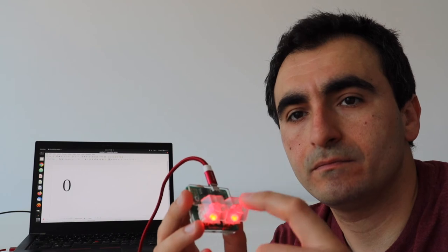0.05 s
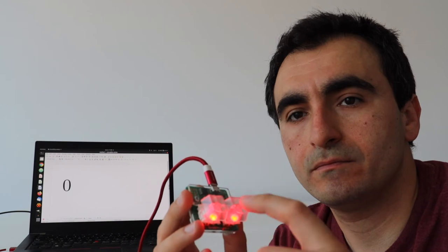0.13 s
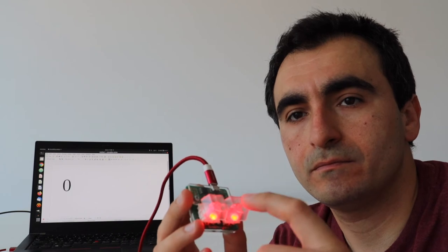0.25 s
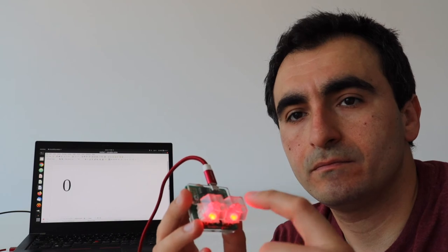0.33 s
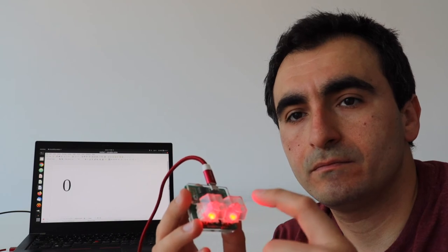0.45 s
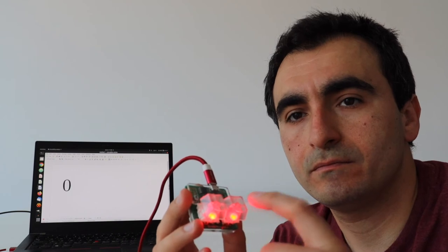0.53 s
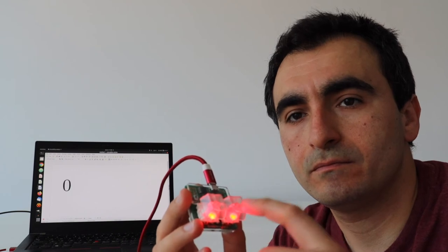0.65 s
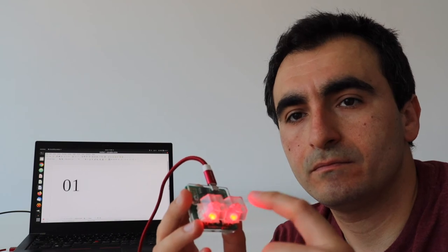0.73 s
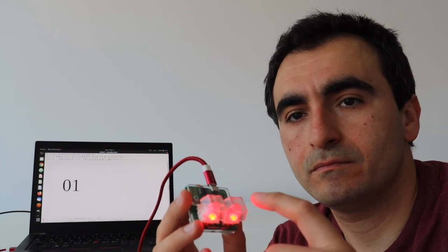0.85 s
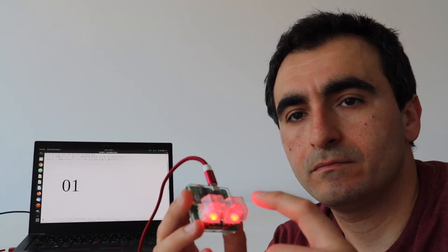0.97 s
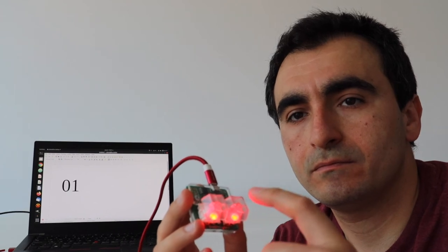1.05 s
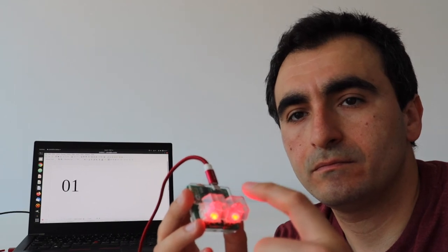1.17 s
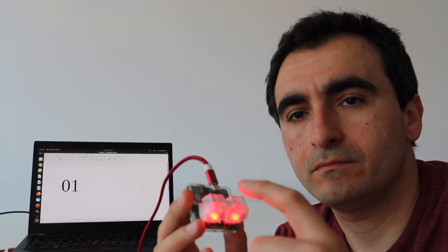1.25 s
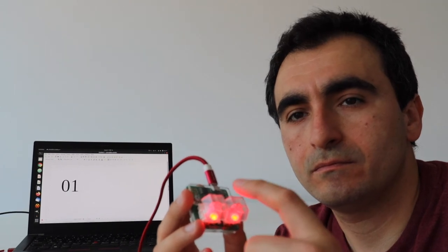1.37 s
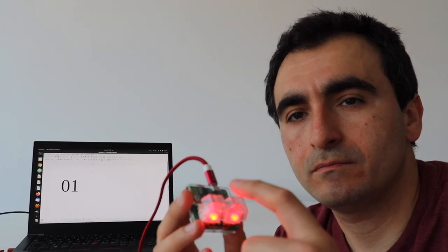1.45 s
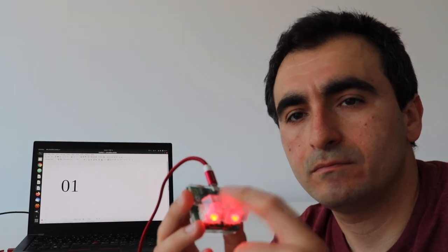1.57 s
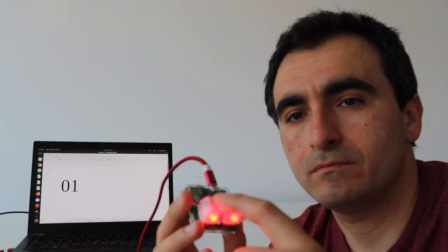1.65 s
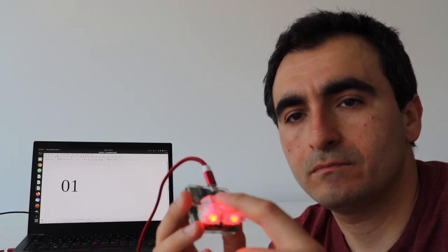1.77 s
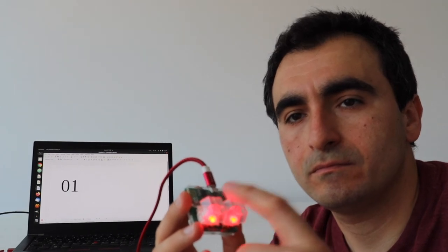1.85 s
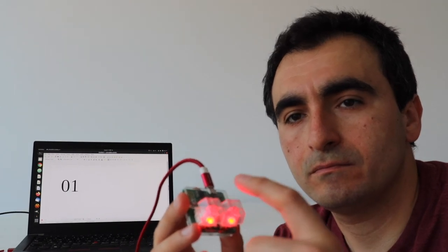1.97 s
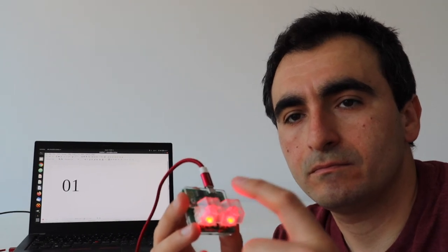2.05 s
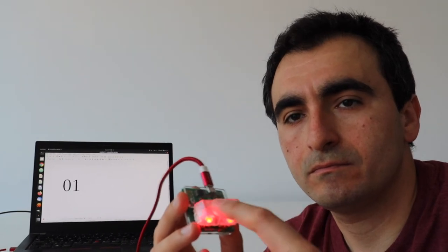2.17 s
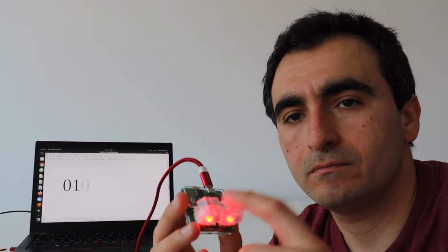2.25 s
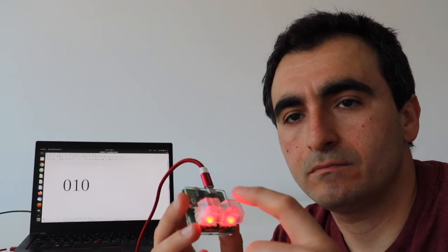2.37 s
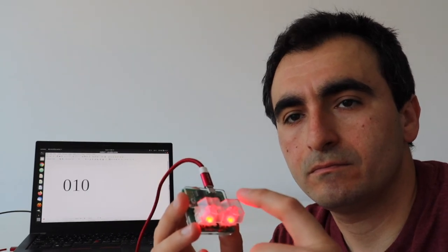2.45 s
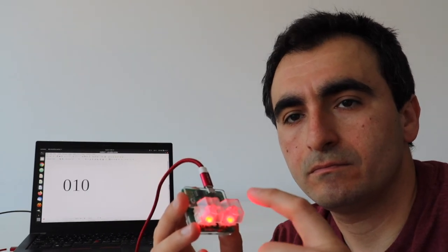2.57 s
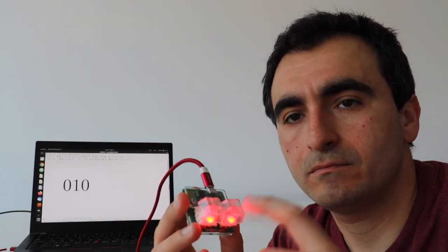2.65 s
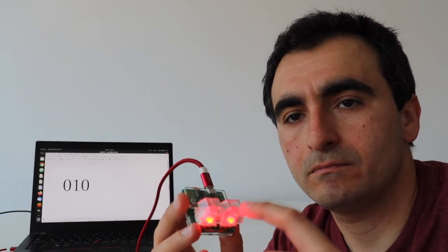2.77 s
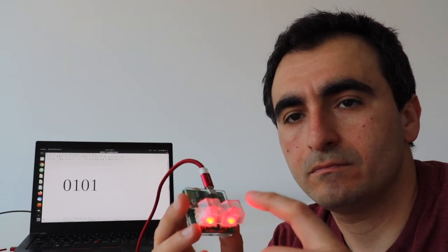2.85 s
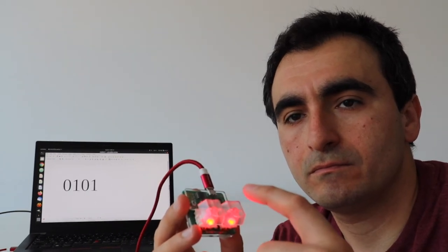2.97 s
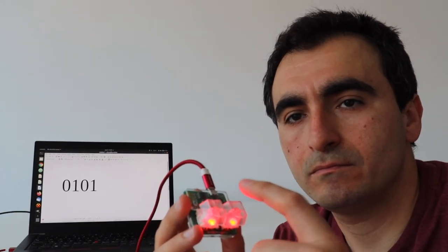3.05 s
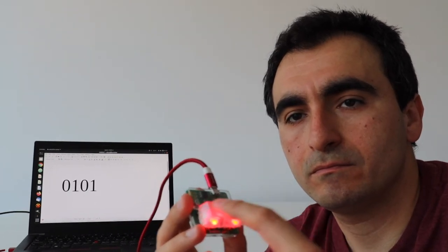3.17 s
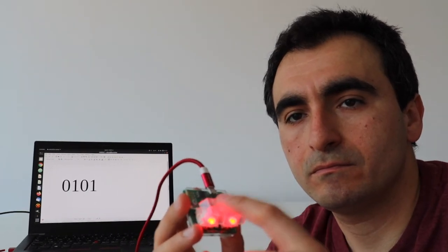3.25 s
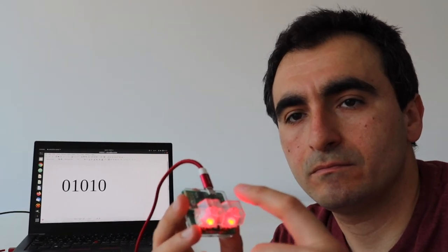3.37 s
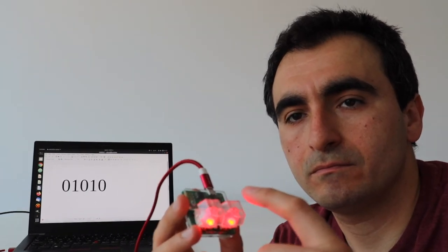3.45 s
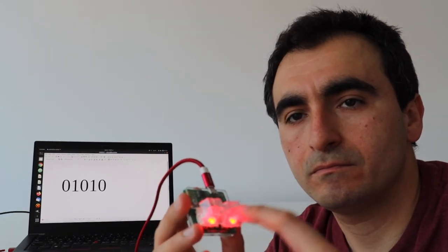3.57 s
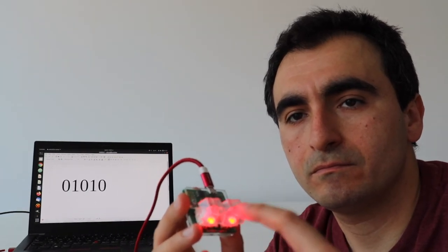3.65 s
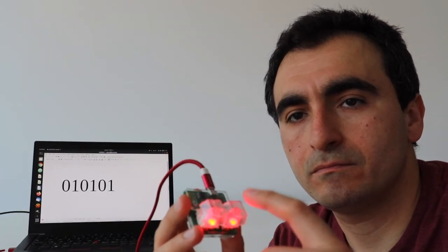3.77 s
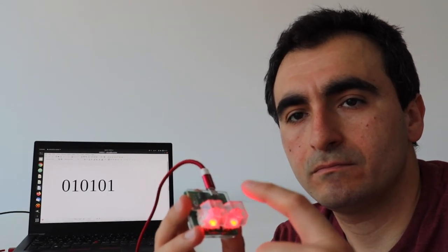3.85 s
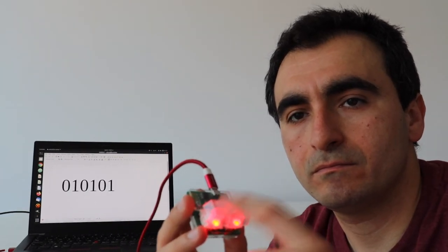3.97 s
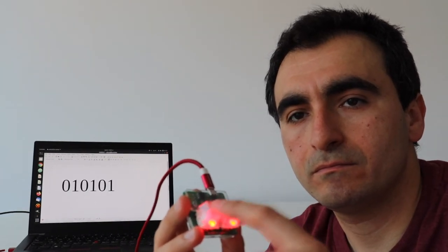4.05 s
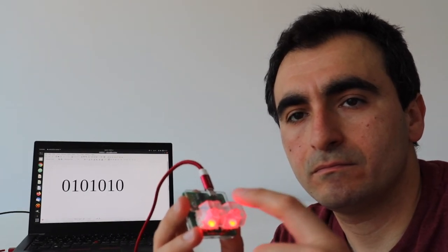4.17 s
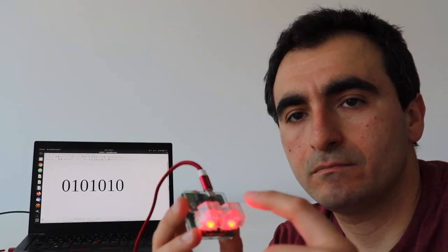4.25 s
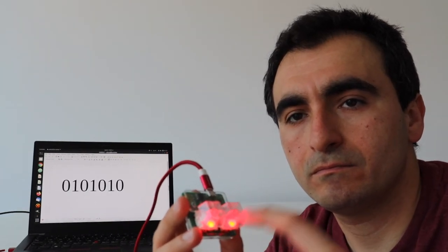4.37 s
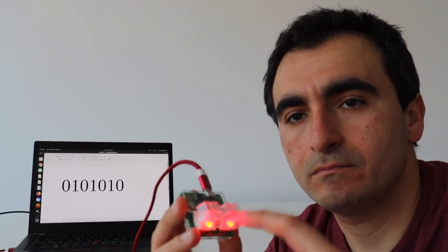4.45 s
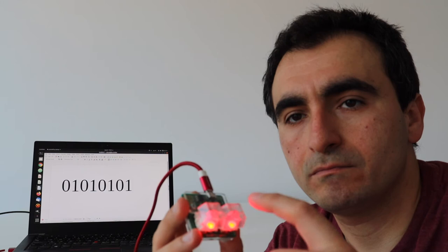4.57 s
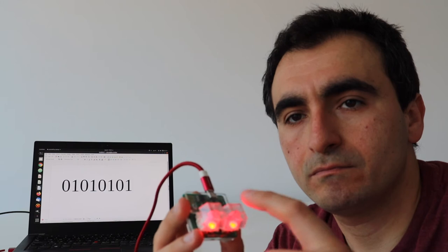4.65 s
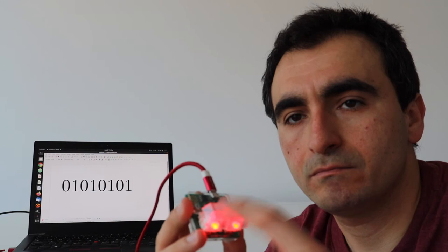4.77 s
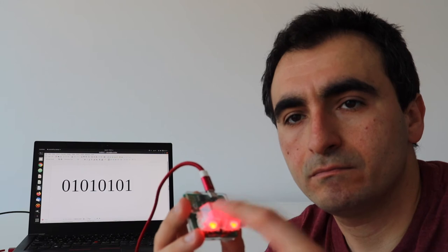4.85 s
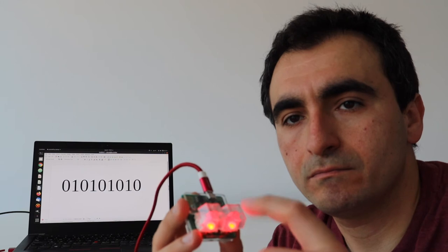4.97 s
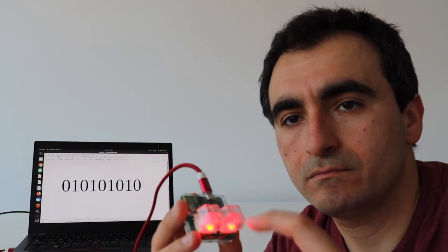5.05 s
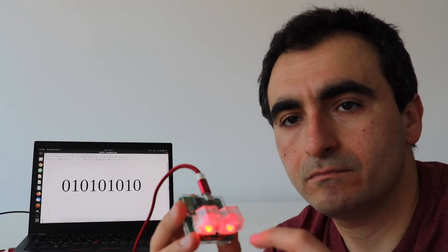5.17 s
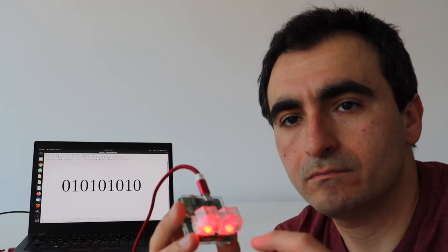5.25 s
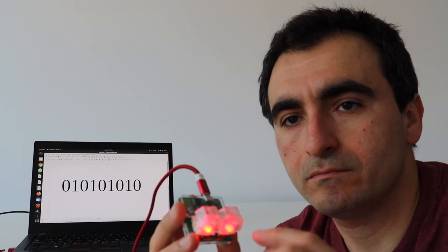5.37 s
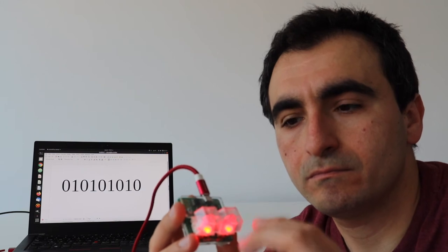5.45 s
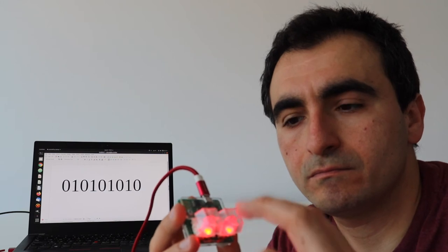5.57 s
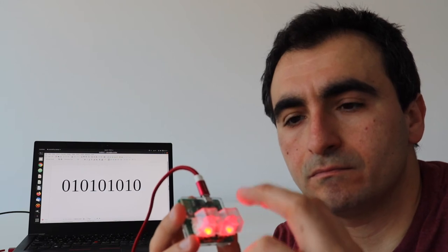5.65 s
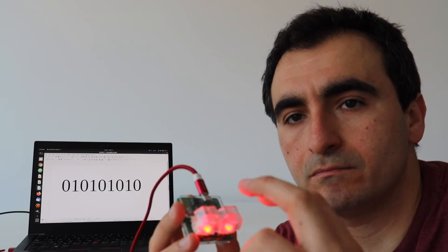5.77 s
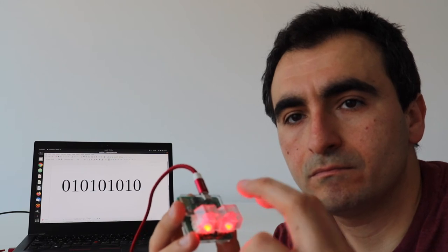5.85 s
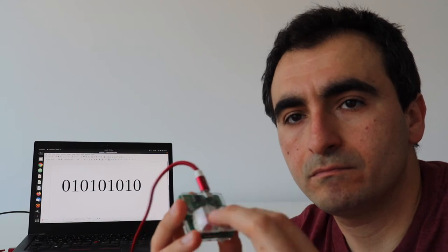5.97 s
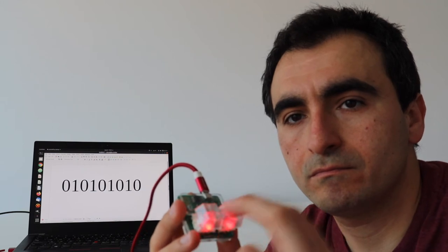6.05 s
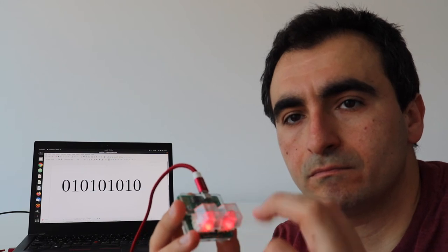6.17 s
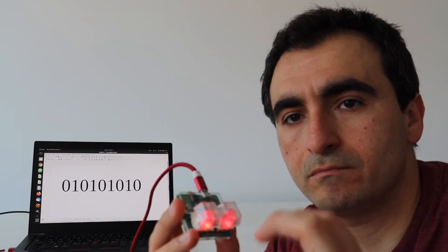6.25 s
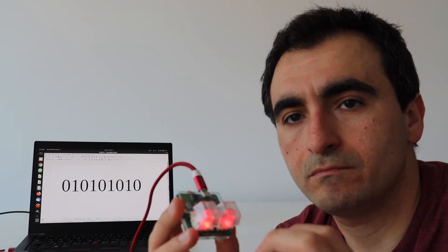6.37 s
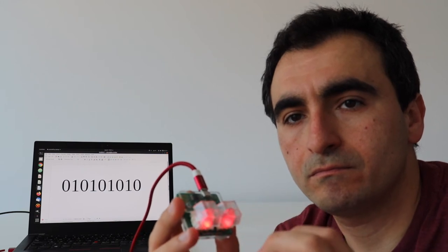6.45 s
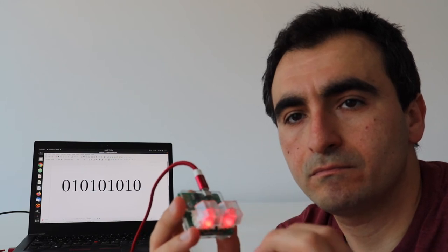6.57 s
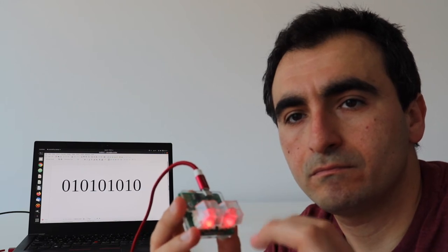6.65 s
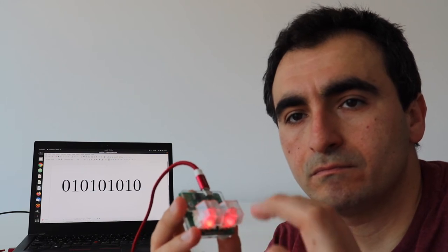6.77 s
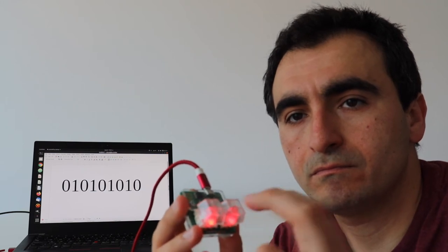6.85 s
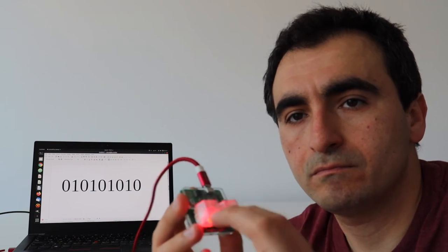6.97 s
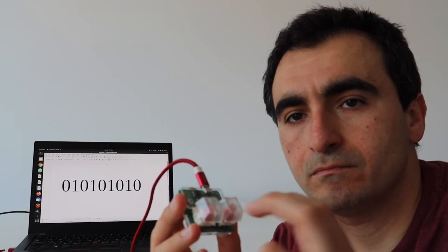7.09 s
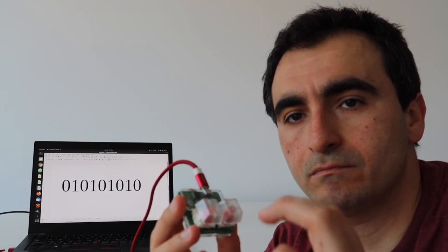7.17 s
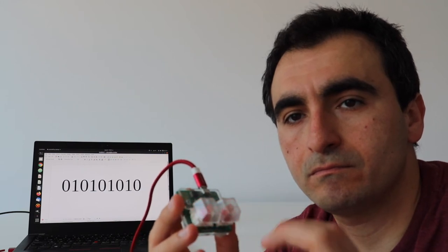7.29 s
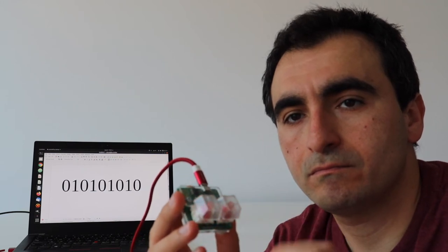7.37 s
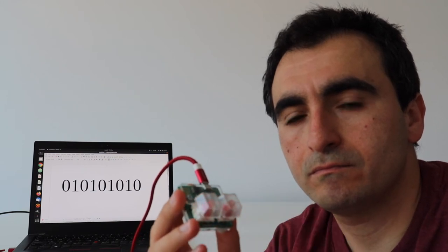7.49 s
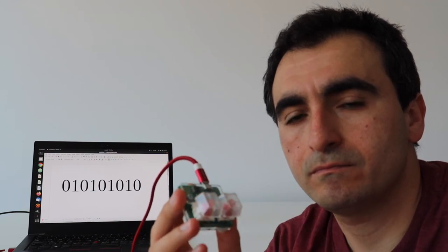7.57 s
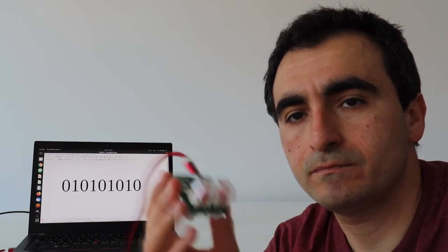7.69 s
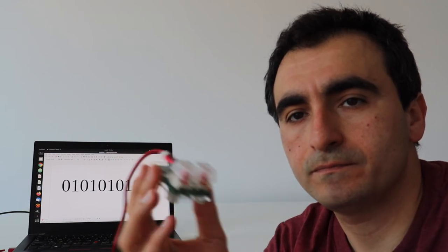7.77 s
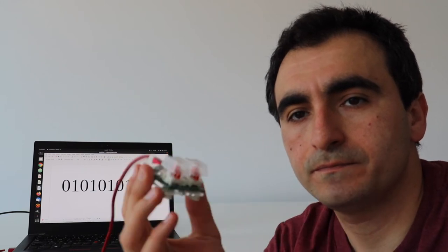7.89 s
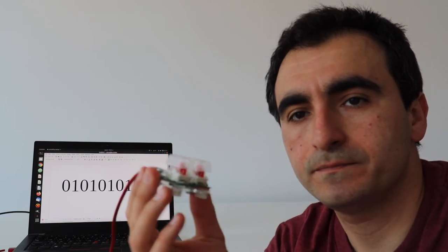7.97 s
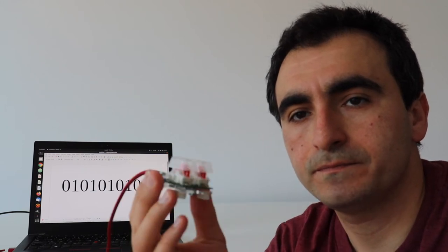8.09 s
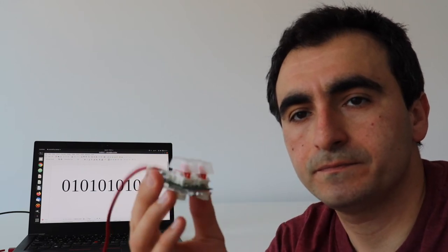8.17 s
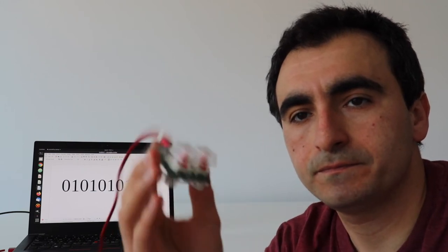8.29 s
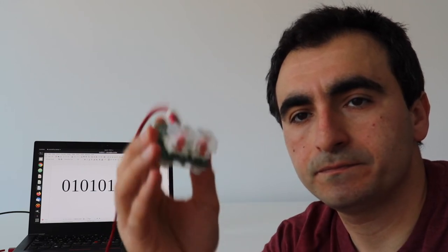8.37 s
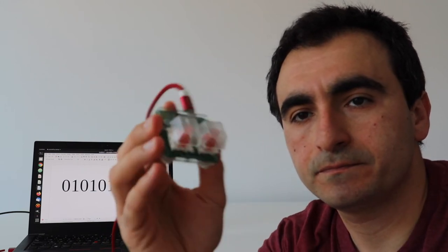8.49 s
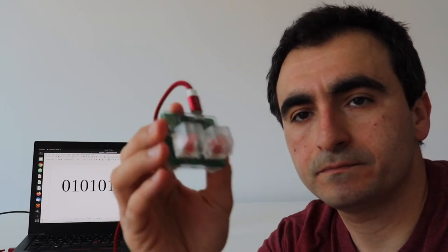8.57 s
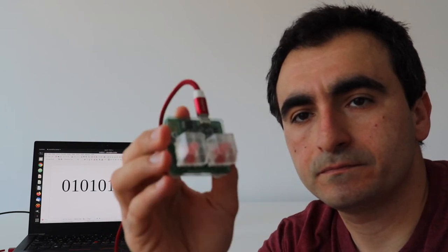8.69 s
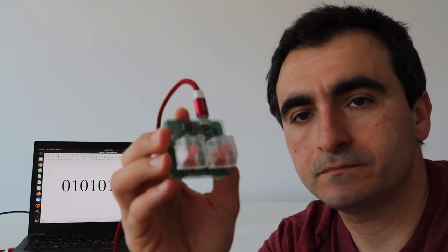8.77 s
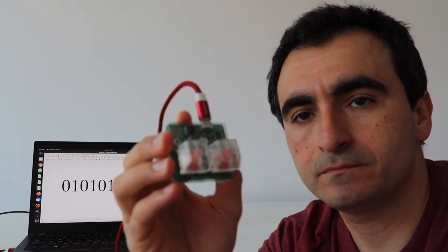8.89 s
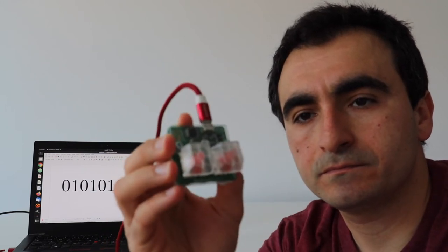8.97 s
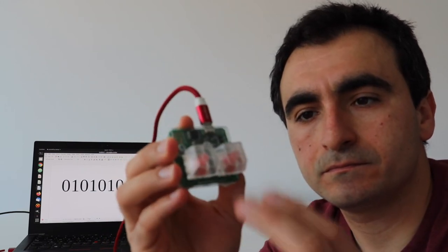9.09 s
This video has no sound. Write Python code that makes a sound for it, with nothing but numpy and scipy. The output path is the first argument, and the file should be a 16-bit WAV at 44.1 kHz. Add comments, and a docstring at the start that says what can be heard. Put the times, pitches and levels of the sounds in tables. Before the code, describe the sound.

Sharp plastic key clicks, each a bright press and a lighter release, ring through a bare room over a very faint wavering whine.

```python
"""Clicky switches on a small hand-held key pad are tapped in a bare, ringing room.
Each press rubs faintly, strikes the bottom and may chatter; the spring then throws the key back.
Sharp impacts excite the damped modes of the switch, and loose caps tick; noise taps form the room's ring.
Behind them are a faint wavering sine whine, and room hum and soft rustles made of filtered noise."""
import sys
import numpy as np
from scipy import signal
from scipy.fft import rfft, irfft
from scipy.io import wavfile
from scipy.ndimage import uniform_filter1d

SR = 44100
rng = np.random.default_rng(int(sys.argv[2]) if len(sys.argv) > 2 else 0)


def output_pcm(signal):
    """Save a mono or channel-first signal as 16-bit PCM at the path in sys.argv[1].

    Samples are clipped to [-1, 1] before scaling.
    """
    pcm = np.clip(np.atleast_2d(signal).T, -1, 1) * 32767
    wavfile.write(sys.argv[1], SR, np.round(pcm).astype(np.int16))


N = 402633
LEAD = SR // 2  # samples computed ahead of the start, so that earlier sound can still ring

# keys striking the bottom; chatter_share is the rebounds' part of the energy, favoured_hz suits the contact point
# columns: strike_s, level_db (relative), chatter_share (0-1), spring_db (relative), favoured_hz
KEY_PRESSES = [(0.6691, -4, 0.01, 0, 3450), (2.2219, 5.5, 0.31, 1.5, 2050), (2.7624, 1, 0.01, -5, 5000),
               (3.242, 7, 0, 3, 4550), (3.656, 2.5, 0.04, 1, 2780), (4.0637, 4, 0.15, 5, 2150),
               (4.4643, 4.8, 0.04, 1, 3330), (4.8673, 2, 0.32, 4, 5580), (6.0225, 9.7, 0.01, -2, 4440),
               (6.0262, 5.5, 0, -2, 2502), (6.028, -0.5, 0.6, 12, 4250), (7.0072, 8.5, 0.06, -1, 3700),
               (7.0093, 2.5, 0.3, 9.5, 5160)]


def amp(db):
    """Gain follows level: 20 dB is a factor of ten in amplitude."""
    return 10 ** (np.asarray(db) / 20)


def unit(x):
    """Normalization: divides by the root mean square, so that the rms is 1."""
    return x / np.sqrt(np.mean(x ** 2) + 1e-20)


def read(points, hz):
    """Logarithmic frequency scale: joins (Hz, value) points by straight lines on it."""
    point_hz, value = np.transpose(points)
    return np.interp(np.log(hz + 1), np.log(point_hz), value)


def bell(hz, centre_hz, width_hz):
    """Gaussian band: a smooth hump of height 1 over frequency."""
    return np.exp(-2 * ((hz - centre_hz) / width_hz) ** 2)


def add(mix, start_s, sound):
    """Superposition: sums a sound into the mix at a time."""
    part = mix[..., max(round(start_s * SR), 0):][..., :sound.shape[-1]]
    part += sound[..., :part.shape[-1]]


def narrow_noise(centre_hz, width_hz, count):
    """Band filtering: white noise kept around one frequency, at rms 1."""
    spectrum = rfft(rng.standard_normal(count))
    spectrum *= bell(np.fft.rfftfreq(count, 1 / SR), centre_hz, width_hz)
    return unit(irfft(spectrum, count))


def presses(shove_db=-22.5):
    """Impact excitation: stems hit the bottom; slant sets the colour, hard blows also shove the board."""
    # a square blow rings the housing; a slanted one rings it less and sounds harder
    # slopes: dB for full chatter, then dB per dB of blow (a stronger blow reaches deeper into the housing)
    square_housing_db, slant_housing_db, housing_per_blow_db = 3.5, -20, 0.26
    square_hard_db, slant_hard_db = -2, 10.5
    # strong and slanted blows throw more sound into the room
    base_throw_db, slant_throw_db, throw_per_db = -4.5, 3.5, 0.3732
    out = np.zeros((2, N + LEAD))
    for strike_s, level_db, chatter, spring_db, favoured_hz in KEY_PRESSES:
        housing_db = square_housing_db + slant_housing_db * chatter + housing_per_blow_db * level_db
        hard_db = square_hard_db + slant_hard_db * chatter
        throw_db = base_throw_db + slant_throw_db * chatter + throw_per_db * level_db
        ring = switch_ring(False, leaf_hz=7560, cap_db=0.2, housing_db=housing_db, spring_db=spring_db,
                           hard_db=hard_db, favoured_hz=favoured_hz, push_db=shove_db + level_db)
        blow = strike(ring, chatter, chatter_s=0.0019, room_db=throw_db)
        add(out, strike_s + LEAD / SR, amp(level_db) * blow)
    return out


def releases(gain_db=1.72, base_housing_db=1.1, base_spring_db=3.0, shove_db=-15.5):
    """Stored spring energy: springs throw the keys back against their top stops, where they chatter."""
    # keys springing back; the first is let go just before the start, so only its ring in the room is heard
    # columns: strike_s, level_db (relative), chatter_share (0-1), bright_db (relative), leaf_hz, favoured_hz
    returns = [(-0.15, 1, 0.4, -6, 7350, 3340), (0.7319, -4.5, 0.43, -6, 8530, 3540),
               (1.7603, -12, 0.45, -6.5, 7700, 1860), (2.2925, -1.8, 0.7, -1, 7500, 2810),
               (2.828, -2.3, 0.35, -6, 8400, 3520), (3.3136, -2.5, 0.72, -4.5, 7700, 4650),
               (3.7299, -1.5, 0.36, -7, 8370, 3550), (4.1396, -1.5, 0.45, -2.5, 7930, 2120),
               (4.5364, 0.5, 0.44, -2, 7360, 3270), (4.9267, 1.5, 0.58, -1.5, 7600, 5540),
               (6.0888, 1, 0.6, -1.3, 7600, 6000), (6.0983, -5, 0, -8, 7500, 4345),
               (6.0997, -0.5, 0.26, 2, 7500, 4340), (7.0705, 3.5, 0.55, 4, 7470, 4310),
               (7.0747, 0.5, 0.35, -0.5, 7600, 4340)]
    # a bright release also rings housing and spring more (dB per dB of brightness)
    housing_per_db, spring_per_db = 0.22, 0.47
    # a chattering release throws more into the room
    base_throw_db, chatter_throw_db = -4.5, 6
    out = np.zeros((2, N + LEAD))
    for strike_s, level_db, chatter, bright_db, leaf_hz, favoured_hz in returns:
        housing_db = base_housing_db + housing_per_db * bright_db
        spring_db = base_spring_db + spring_per_db * bright_db
        throw_db = base_throw_db + chatter_throw_db * chatter
        ring = switch_ring(True, leaf_hz, cap_db=0.06, housing_db=housing_db, spring_db=spring_db,
                           hard_db=bright_db, favoured_hz=favoured_hz, push_db=shove_db + level_db)
        blow = strike(ring, chatter, chatter_s=0.0027, room_db=throw_db)
        add(out, strike_s + LEAD / SR, amp(level_db + gain_db) * blow)
    return out


def ticks(base_cap_db=5.5, base_hard_db=3.0, shove_db=-20):
    """Light impact: loose caps knock on their stems; dull ticks are mostly cap, bright ones hard edge."""
    # loose caps tick as a finger lands or the pad is turned
    # columns: strike_s, level_db (relative), bright_db (relative)
    cap_ticks = [(0.642, -12, -5), (1.6654, -24, 3.5), (2.2151, -4.5, 2), (2.7462, -8.5, -5.5),
                 (2.749, -11, -2), (3.6409, -12.5, -4), (4.0546, -5.5, 3), (4.1241, -12, 8),
                 (4.4508, -10, -3.5), (4.8563, -8, 1), (7.0003, -6, 0), (7.6786, -32, -1), (7.7458, -29, 5),
                 (7.8087, -36.5, 9), (8.2895, -33.5, 7)]
    out = np.zeros((2, N + LEAD))
    for strike_s, level_db, bright_db in cap_ticks:
        ring = switch_ring(True, leaf_hz=7710, cap_db=base_cap_db - bright_db, housing_db=1.4,
                           spring_db=-0.5, hard_db=base_hard_db + bright_db, favoured_hz=3400,
                           push_db=shove_db + level_db)
        blow = strike(ring, chatter=0.4, chatter_s=0.0025, room_db=2.5)
        add(out, strike_s + LEAD / SR, amp(level_db) * blow)
    return out


def stem_rubs(same_stroke_s=0.05):
    """Friction excitation: before a stroke lands, the stem rubs down its guide and excites the same body."""
    # a faster push takes less time and rubs louder (travel and level for a 0 dB blow, then dB per dB)
    base_travel_s, base_rub_db, rub_per_db = 0.021, -49.5, 1.53
    out, previous_s = np.zeros(N + LEAD), -np.inf
    ring = switch_ring(True, leaf_hz=7930, cap_db=-3.5, housing_db=-2.0, spring_db=-4.0,
                       hard_db=4.0, favoured_hz=3410, push_db=-24.0)
    for strike_s, level_db, *_ in KEY_PRESSES:
        if strike_s - previous_s > same_stroke_s:
            travel_s = base_travel_s / amp(level_db)
            count = int(travel_s * SR)
            rub = rng.standard_normal(count) * signal.windows.tukey(count, 0.3)
            rub_gain = amp(base_rub_db + rub_per_db * level_db)
            add(out, strike_s - travel_s + LEAD / SR, rub_gain * np.convolve(rub, ring))
        previous_s = strike_s
    return out


def strike(ring, chatter, chatter_s, room_db, count=16):
    """Repeated impact: one hard blow and tiny rebounds; returns the direct sound and what enters the room."""
    when = (np.arange(count) + 1 + rng.random(count)) / count  # in units of chatter_s
    rebounds = np.zeros(SR // 100)
    at = np.minimum(when * chatter_s * SR, len(rebounds) - 1).astype(int)
    rebounds[at] = rng.choice([-1, 1], count) * np.exp(-1.3 * when ** 2)
    spectrum = rfft(rebounds)
    rebounds = irfft(spectrum / np.sqrt(abs(spectrum) + 1e-9), len(rebounds))  # flatter: little colour of its own
    share = np.clip(chatter, 0, 1)
    click = np.convolve(rebounds, ring)
    click *= np.sqrt(share) / np.linalg.norm(click)
    click[:len(ring)] += np.sqrt(1 - share) * ring
    # the room gathers the sound of all sides, so the body's own ring outweighs the rattle
    thrown = 0.8 * click + np.pad(ring, (0, len(click) - len(ring)))
    direct = click / np.linalg.norm(click)
    return np.array([direct, amp(room_db) * thrown / np.linalg.norm(thrown)])


def switch_ring(released, leaf_hz, cap_db, housing_db, spring_db, hard_db, favoured_hz, push_db, size=2048):
    """Modal response: one sharp impact excites resonances, each blow stirring the parts differently."""
    # resonances of cap, housing and spring
    # columns: mode_hz, width_hz, pressed_db (relative), released_db (relative)
    modes = [(980, 400, -22.5, -12), (2360, 344, -16, -8.5), (2620, 350, -6, -7.5), (3050, 330, -17, -13),
             (3440, 330, -0.5, -3.5), (4310, 270, -6, -27.5), (4799, 470, -6.5, -11.5), (5460, 500, -5, -9),
             (6690, 1600, -38, -10), (7540, 450, -15, -2.5), (8680, 190, -12.5, -10.5),
             (9480, 300, -24.5, -35.5), (12361, 1952, -16, -16.5), (14625, 700, -31, -30.5)]
    hz = abs(np.fft.fftfreq(size, 1 / SR)) + 1
    leaf = (leaf_hz, 105, -10.5, 1.8)  # the contact leaf rings longest, at a pitch set by the key and its travel
    power = 0
    for mode_hz, width_hz, pressed_db, released_db in [*modes, leaf]:
        mode_db = released_db if released else pressed_db
        power = power + amp(mode_db) ** 2 / (1 + (2 * (hz - mode_hz) / width_hz) ** 2)
    small_hz, board_hz = 1750, 220
    radiated = 1 / (1 + (small_hz / hz) ** 4)  # so small a body radiates little bass
    shoved = amp(push_db) ** 2 / (1 + (board_hz / hz) ** 2)
    power *= radiated + shoved
    colour_db = cap_db * bell(hz, 2244, 1400)
    colour_db += housing_db * bell(hz, 5000, 2000)
    colour_db += spring_db * bell(hz, 7600, 2200)
    colour_db += hard_db * np.clip((hz - 8000) / 1800, 0, 1)
    colour_db += 5.0 * bell(hz, favoured_hz, 420)  # where the blow lands decides which mode rings most
    log_gain = np.log(power) / 2 + np.log(amp(colour_db))
    # minimum phase makes it causal: sudden start, then decay
    ring = np.fft.ifft(np.exp(np.conj(signal.hilbert(log_gain)))).real[:size // 2]
    ring = disperse(ring)
    return ring / np.linalg.norm(ring)


def disperse(x):
    """Dispersion: bending waves cross plastic at unequal speeds, so a click swells for a cycle before its peak."""
    lag_hz, pole_radius = 4800, 0.72
    poles = [1, -2 * pole_radius * np.cos(2 * np.pi * lag_hz / SR), pole_radius ** 2]
    return signal.lfilter(poles[::-1], poles, x)  # all-pass


def room(x, room_db):
    """Reverberation: a few wall reflections and a dense tail with frequency-dependent decay."""
    # decay time of the room's ring; columns: band_hz, t60_s
    decay = [(500, 2), (1500, 1.26), (2600, 1), (3600, 1.1551), (5200, 1.2), (7500, 0.92), (10000, 0.62),
             (14000, 0.58)]
    # colour of the room's ring; columns: band_hz, level_db (relative)
    colour = [(400, -5), (1500, 3.5), (2600, 0.2), (3100, 1.5), (3480, -4), (3900, 3.5), (4400, 0),
              (5500, -2.5), (6600, -1), (7700, -2), (9200, 1), (14000, -5.5)]
    # first reflections; columns: delay_s, level_db (relative to the sound entering the room)
    reflections = [(0.0040, -17), (0.0079, -27), (0.0103, -25.5), (0.0214, -34), (0.0256, -35.5)]
    count = SR * 3 // 2
    taps = rng.standard_normal(count) * (rng.random(count) < 0.3)
    hz, t, spectrum = signal.stft(taps, SR, nperseg=256)
    decay_db = -60 * t / read(decay, hz)[:, None]
    spectrum *= amp(read(colour, hz)[:, None] + decay_db)
    tail = signal.istft(spectrum, SR, nperseg=256)[1][:count]
    tail *= np.clip(np.arange(count) / SR / 0.0037, 0, 1)  # the tail builds up over 3.7 ms
    tail *= amp(room_db) / np.linalg.norm(tail)
    for delay_s, level_db in reflections:
        add(tail, delay_s, amp([level_db]))
    return signal.fftconvolve(x, tail)[:len(x)]


def keys():
    """Direct and reverberant fields: ticks, rubs, presses and releases, each heard in both."""
    light, down, up = ticks() + stem_rubs(), presses(), releases()
    direct = light[0] + down[0] + up[0]
    wet = room(light[1], room_db=-11.0) + room(down[1], room_db=-10.0) + room(up[1], room_db=-9.5)
    return (direct + wet)[LEAD:]


def whine(waver_hz=2.5, flutter=0.23, gain_db=0.5, drift_db=1.5, drift_hz=5):
    """Frequency and amplitude modulation: a faint sine, perhaps a small fan, wavers in pitch and strength."""
    # strength over time; columns: time_s, level_db (before gain and drift)
    strength = [(0.0, -63.5), (1.8, -59.5), (4.04, -59.5), (4.65, -65.5), (5.11, -61), (6.03, -57.5),
                (6.05, -64), (6.53, -58), (6.58, -67.5), (7.22, -62), (7.35, -67.5), (8.03, -60.5),
                (8.16, -69), (9.13, -67)]
    centre_hz = 891.5
    level_db = gain_db + np.interp(np.arange(N) / SR, *np.transpose(strength))
    level = amp(level_db + drift_db * narrow_noise(0, drift_hz, N))
    turns = np.cumsum(centre_hz + waver_hz * narrow_noise(0, 8, N)) / SR
    return level * unit(np.sin(2 * np.pi * turns) * (1 + flutter * narrow_noise(0, 25, N)))


def rustles():
    """Noise bursts: dull band-limited swells and low stirs come and go."""
    # columns: middle_s, length_s, centre_hz, width_hz, level_db (rms before the fades)
    swells = [(1.0, 0.93, 90, 45, -59), (2.24, 0.43, 430, 440, -55.5), (3.43, 0.32, 400, 410, -59.5),
              (3.63, 0.16, 165, 32, -56), (4.6, 0.5, 158, 44, -57), (5.08, 0.42, 129, 25, -61),
              (5.371, 0.25, 254, 30, -63.5), (8.75, 0.51, 443, 220, -66.5)]
    out = np.zeros(N)
    for middle_s, length_s, centre_hz, width_hz, level_db in swells:
        count = int(length_s * SR)
        swell = narrow_noise(centre_hz, width_hz, count) * signal.windows.tukey(count, 0.8)
        add(out, middle_s - length_s / 2, amp(level_db) * swell)
    return out


def air():
    """Filtered random noise: steady hiss over a rumble that swells and sinks, with narrow room drones."""
    # spectrum of the background; columns: band_hz, level_db (per Hz, relative)
    spectrum_shape = [(18, -50), (26, -20.5), (38, -6.5), (55, -2), (80, -6.5), (105, -16.5), (165, -7),
                      (228, -11), (337, -15), (678, -18), (870, -11), (1120, -21), (4180, -30),
                      (15500, -33)]
    # narrow drones of the room; columns: centre_hz, width_hz, level_db (rms)
    drones = [(49, 3.3, -64), (76, 11, -70.5), (120, 5, -76.5), (154.8, 8, -64), (177, 14, -73),
              (252.5, 10, -78), (770, 25, -77), (836, 7.1, -70), (97, 12, -78), (912, 73, -72)]
    # strength of the rumble over time; columns: time_s, level_db (rms)
    rumble_level = [(0.0, -59), (0.48, -65), (2.82, -63), (3.0, -79), (3.07, -72.5), (5.06, -64),
                    (5.74, -71), (5.8, -60), (5.97, -72.5), (6.89, -61.5), (7.5, -69), (8.82, -59),
                    (9.13, -66)]
    hiss_db = -64  # rms of the band from 1.2 to 15 kHz
    hz = np.fft.rfftfreq(N, 1 / SR)
    spectrum = rfft(rng.standard_normal(N)) * amp(read(spectrum_shape, hz))
    hiss_rms = np.std(irfft(spectrum * (hz > 1200) * (hz < 15000), N))
    sound = amp(hiss_db) * irfft(spectrum, N) / hiss_rms
    for centre_hz, width_hz, level_db in drones:
        sound += amp(level_db) * narrow_noise(centre_hz, width_hz, N)
    rumble = irfft(rfft(sound) / (1 + (hz / 66) ** 8), N)  # the part below about 66 Hz
    level = amp(np.interp(np.arange(N) / SR, *np.transpose(rumble_level)))
    evened = rumble / np.sqrt(uniform_filter1d(rumble ** 2, SR // 2))
    return sound - rumble + level * evened


def scene():
    """Middle and side stereo: the keys are central; the background differs a little between channels."""
    # side signal against the middle's background; columns: band_hz, level_db (relative)
    side_level = [(40, -22), (200, -27), (500, -18), (900, -37.5), (1800, -28), (4200, -25), (7000, -21),
                  (14000, -11.5)]
    middle = keys() + air() + whine() + rustles()
    side_gain = amp(read(side_level, np.fft.rfftfreq(N, 1 / SR)))
    side = irfft(rfft(air()) * side_gain, N)
    return np.array([middle + side, middle - side])


def record(dry):
    """Saturation and band limiting: overload rounds off the hardest peaks, then a low-pass filter acts."""
    cut_hz = 15900
    rounded = dry / (1 + (dry / 0.7) ** 6) ** (1 / 6)  # never exceeds 0.7
    low_pass = signal.firwin(255, cut_hz, window=("kaiser", 8), fs=SR)
    return signal.oaconvolve(rounded, low_pass[None], "same", axes=1)


dry = scene()
out = record(dry)
output_pcm(out)
```